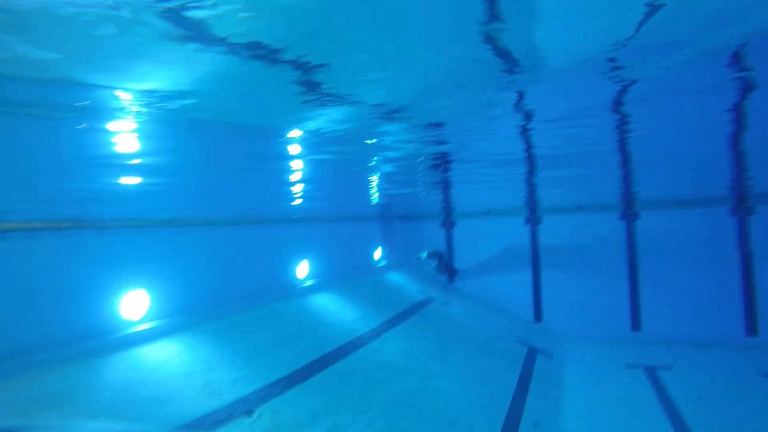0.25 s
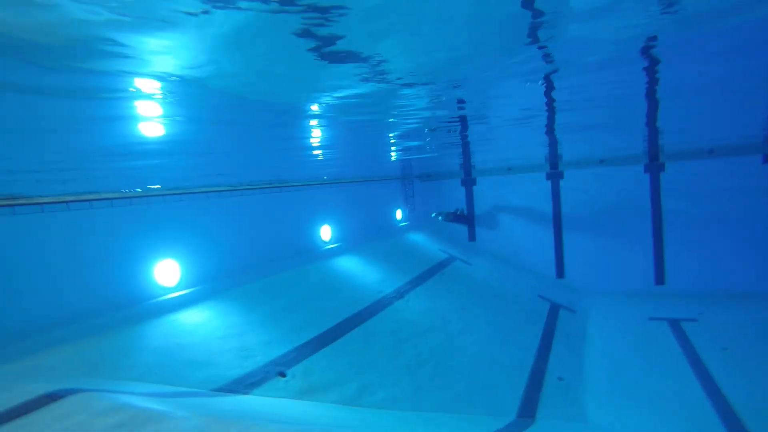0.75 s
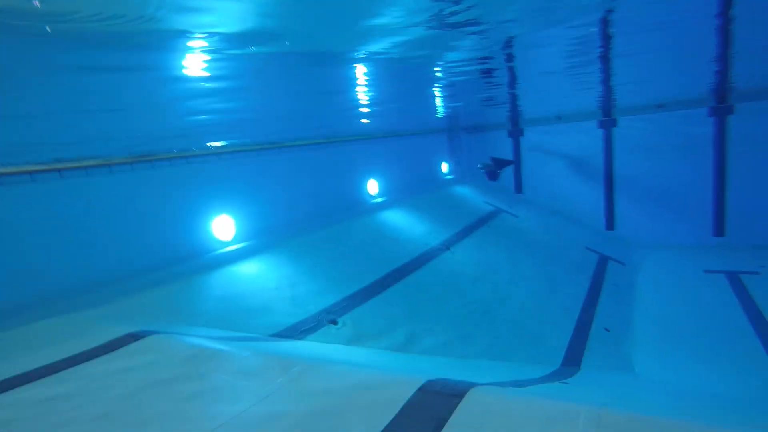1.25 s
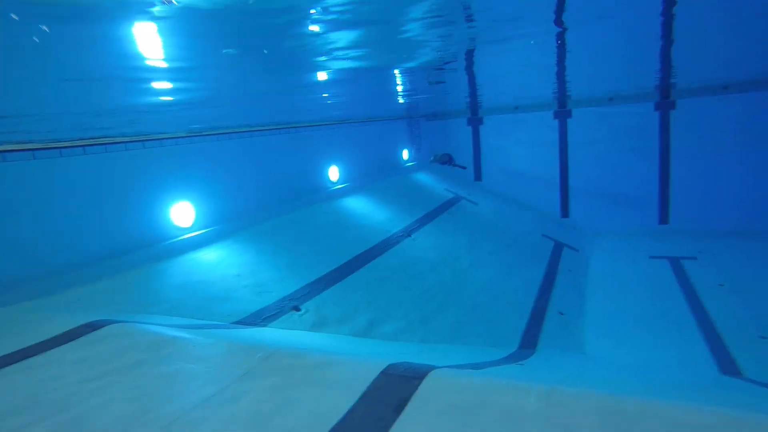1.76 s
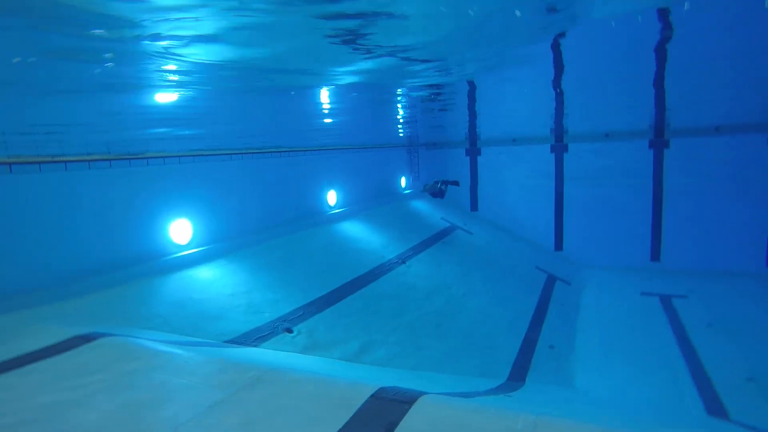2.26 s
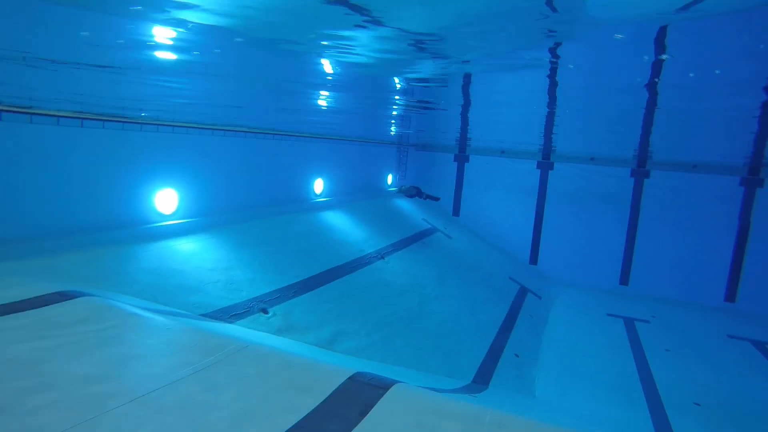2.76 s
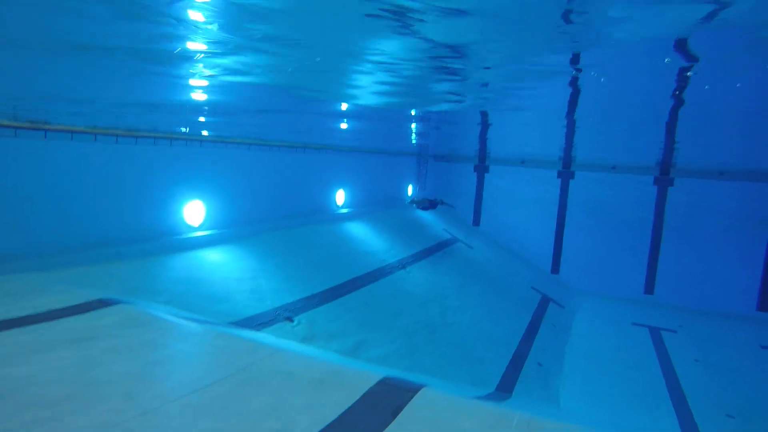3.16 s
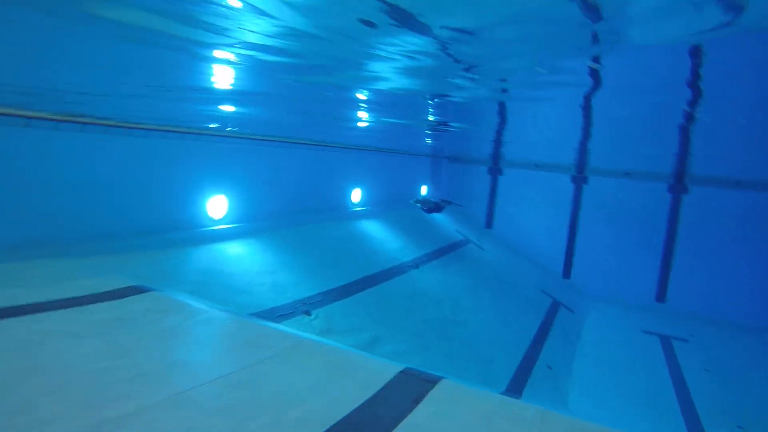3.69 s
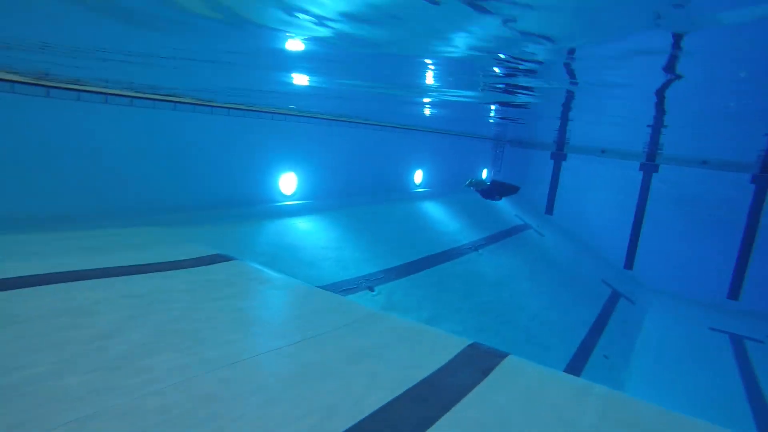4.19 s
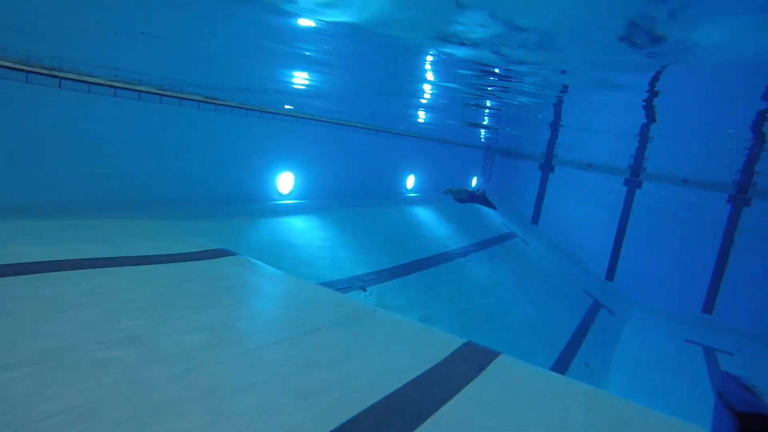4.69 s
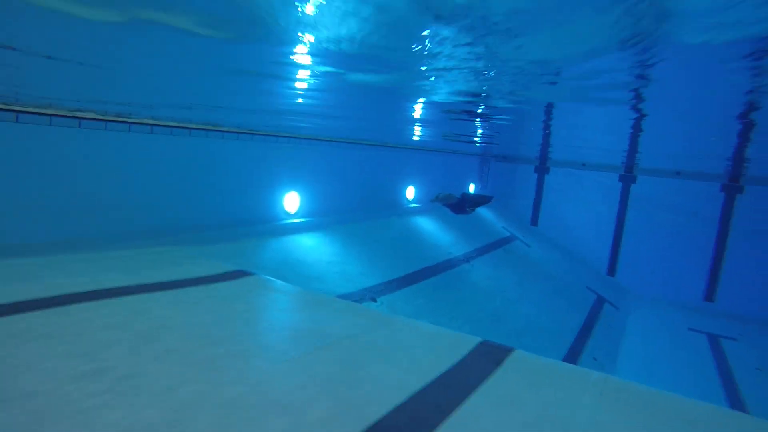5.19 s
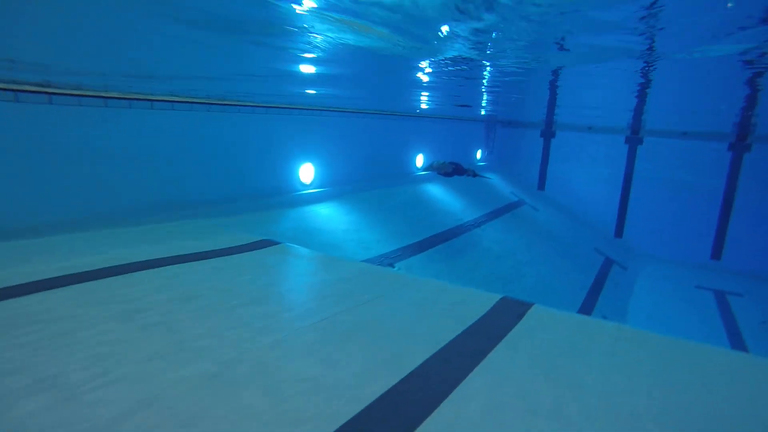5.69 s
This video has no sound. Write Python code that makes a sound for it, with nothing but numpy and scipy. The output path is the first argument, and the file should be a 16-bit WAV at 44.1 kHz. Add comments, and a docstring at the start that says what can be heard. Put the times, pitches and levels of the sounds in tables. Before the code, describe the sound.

Inside a sealed camera housing submerged in an indoor pool, water heaves in deep uneven rumbles and booming jolts. The hand scrapes and bumps the shell, mostly during the first two seconds, among hollow knocks and bubble pings. Later it is calmer, with two short creaks around three and four seconds, sparse high ticks and a small plink near the end, over faint fizz.

```python
"""Hand-held camera housing under water

Water buffets a sealed camera housing in a pool: slow surges, heaves and jolts of low-passed noise and tones.
The hand rubs, bumps and creaks on the shell: gritty noise and slip pulses through resonances.
Bubble pings, small low knocks and high ticks are gliding decaying sines, dry ticks are band-passed clicks,
one plink is a few decaying modes.
Behind it, pool fizz comes through the air gap at the microphone: coloured noise flickering band by band."""
import sys
import numpy as np
from scipy import signal
from scipy.fft import rfft, irfft, next_fast_len
from scipy.io import wavfile
from scipy.ndimage import uniform_filter1d

SR = 44100
rng = np.random.default_rng(int(sys.argv[2]) if len(sys.argv) > 2 else 0)


def master(y):
    """Save y as 16-bit WAV."""
    cut = np.clip(np.atleast_2d(y).T, -1, 1)
    pcm = np.round(cut * 32767)  # scale
    wavfile.write(sys.argv[1], SR, pcm.astype(np.int16))


N = 261954
TIME = np.arange(N) / SR


def undb(db):
    """Decibels to gain."""
    return 10 ** (np.asarray(db) / 20)


def unit(x):
    """Scale to rms 1."""
    return x / np.sqrt(np.mean(x ** 2))


def curve(rows):
    """Table columns joined by straight lines in time."""
    s, *columns = np.transpose(rows)
    return [np.interp(TIME, s, c) for c in columns]


def colour(x, points, lifts=()):
    """Filter by (f/Hz, gain/dB) points plus resonant (f/Hz, half-lift width/Hz, lift/dB) bells."""
    size = next_fast_len(N)
    hz = np.fft.rfftfreq(size, 1 / SR) + 1e-3
    point_hz, point_db = np.transpose(points)
    db = np.interp(np.log(hz), np.log(point_hz), point_db)
    db = db + sum(lift / (1 + (2 * (hz - f) / w) ** 2) for f, w, lift in lifts)
    return irfft(rfft(x, size) * undb(db), size)[:N]


def ring(x, modes, order=1):
    """Sum of resonances, each passed `order` times for steeper skirts."""
    out = 0
    for hz, width_hz, db in modes:
        y = x
        for _ in range(order):
            y = signal.lfilter(*signal.iirpeak(hz, hz / width_hz, SR), y)
        out = out + undb(db) * y
    return out


def walk(rate_hz):
    """Random levels held 1 / rate_hz, smoothed twice, rms 1."""
    k = int(SR / rate_hz)
    held = np.repeat(rng.standard_normal(N // k + 1), k)
    return unit(uniform_filter1d(uniform_filter1d(held, k), k)[:N])


def grit(rate_hz, spread_db):
    """Dense random clicks of uneven size."""
    clicks = (rng.random(N) < rate_hz / SR) * rng.standard_normal(N)
    return clicks * undb(spread_db * rng.exponential(size=N))


def swell(start_s, length_s):
    """Linear rise, plateau and longer fall; at least 10 ms long."""
    u = np.clip((TIME - start_s) / max(length_s, .01), 0, 1)
    rise, fall = 0.24, 0.52  # shares of the length
    return np.minimum(np.minimum(u / rise, (1 - u) / fall), 1)


def peak(s, db, rise_db_s, fall_db_s):
    """Gain that climbs to a peak and dies away, straight in dB."""
    return undb(db - np.where(TIME < s, rise_db_s * (s - TIME), fall_db_s * (TIME - s)))


def swings(rows, wander, rise_db_s, fall_db_s):
    """Low tone swelling at each row, its pitch gliding from row to row with random drift."""
    s, _, hz = np.transpose(rows)
    drift_hz = np.interp(TIME, s, hz) * (1 + wander * walk(15))
    turn = 2 * np.pi * np.cumsum(drift_hz) / SR
    level = sum(peak(s, db, rise_db_s, fall_db_s) for s, db, _ in rows)
    return np.sqrt(2) * np.sin(turn) * level


def even_out(x, window_s):
    """Partly flatten the swells of a noise, rms 1."""
    return unit(x / uniform_filter1d(x ** 2, int(window_s * SR)) ** .45)


def buffet():
    """Eddies rock the housing slowly, keep its soft low mode humming, and heave and jolt it."""
    # water push trend: t/s, slow surge rms level/dB, low shell mode rms level/dB
    push_trend = [(0.0, -34, -47), (0.1, -45, -47), (0.3, -32, -36.5), (0.6, -37, -41.5),
                  (0.85, -35.5, -33.5), (1.0, -43.5, -37), (1.3, -36.5, -45), (1.45, -37.5, -43.5),
                  (1.64, -35, -41.5), (2.2, -39, -45), (3.0, -40, -49), (3.35, -40, -45), (3.9, -43, -50),
                  (4.3, -32, -42.5), (4.65, -39, -44.5), (5.0, -36, -42.5), (5.26, -41.5, -43),
                  (5.94, -39, -41)]
    # surge noise spectrum: f/Hz, relative density/dB
    surge_spectrum = [(6, -0.5), (12, 12), (25, 8), (40, 3), (60, -2), (120, -43)]
    # low shell modes: f/Hz, width per pass/Hz, relative gain/dB
    low_modes = [(71, 25.6, -8), (51, 20, -21)]
    # jolts that set the low mode booming: t of peak/s, peak rms level/dB, mean f/Hz
    jolts = [(0.05, -34.5, 62.9), (0.186, -33, 66.04), (0.279, -21, 64.3), (0.35, -32.5, 58),
             (0.665, -28, 56), (0.776, -30, 68.05), (0.832, -27, 72.9), (1.161, -31.5, 84.1),
             (1.203, -19, 69.75), (1.55, -34, 69), (1.67, -29.5, 72.9), (1.714, -38.5, 73.82),
             (1.785, -28.5, 69.1), (1.97, -42, 63.9), (2.153, -34.5, 66), (2.688, -37.5, 69.95),
             (3.434, -37, 66.9), (3.818, -36, 61.76), (4.06, -39, 69), (4.26, -41, 70.03), (4.87, -40, 72),
             (4.96, -41, 69.1), (5.41, -38, 60.94), (5.703, -34.5, 72.13), (5.835, -34.5, 66.94),
             (5.91, -35.5, 59)]
    # heavier heaves of water: t of peak/s, peak rms level/dB, mean swing rate/Hz
    heaves = [(0.02, -31, 20), (0.391, -25.5, 20), (0.53, -27.5, 16.5), (0.68, -36, 25), (0.83, -35, 15.7),
              (1.125, -31, 24.8), (1.31, -33.5, 20), (1.54, -26, 19.4), (1.65, -33.5, 20.1),
              (1.73, -31.5, 19.7), (1.844, -31.5, 20), (2.085, -31.5, 17.1), (2.76, -31.5, 20.7),
              (3.194, -33, 18), (3.565, -30, 18), (3.845, -32, 21), (4.39, -29.5, 15), (4.54, -32, 22),
              (4.895, -30, 22), (4.99, -33, 24), (5.38, -33, 23), (5.476, -28.5, 23), (5.6, -33, 21),
              (5.826, -31, 24), (5.904, -31.5, 23.3)]
    # brief level dips: t of centre/s, 1/e full width/s, depth/dB
    lulls = [(0.075, 0.029, 6), (0.251, 0.027, 6), (0.455, 0.045, 2.5), (0.57, 0.044, 4.5),
             (0.724, 0.048, 4.5), (1.03, 0.056, 2.5), (1.6, 0.025, 8), (1.76, 0.018, 16), (2.017, .04, 6),
             (3.017, 0.049, 7), (3.498, 0.028, 7), (3.902, 0.061, 6.5), (4.457, 0.036, 3.5),
             (4.604, 0.062, 6.5), (4.857, 0.024, 2), (5.08, 0.038, 10), (5.522, 0.026, 6),
             (5.775, 0.044, 11)]
    eddy_db, eddy_hz = 1.5, 9  # rms random swing about the trend, hold rate
    shell_top_hz = 105.8

    surge_db, mode_db = curve(push_trend)
    surge = even_out(colour(rng.standard_normal(N), surge_spectrum), 0.13)
    hum = even_out(ring(rng.standard_normal(N), low_modes, order=2), 0.065)
    surge = undb(surge_db + eddy_db * walk(eddy_hz)) * surge
    hum = undb(mode_db + eddy_db * walk(eddy_hz)) * hum
    boom = swings(jolts, wander=0.0395, rise_db_s=294, fall_db_s=406)
    lurch = swings(heaves, wander=0.0598, rise_db_s=257, fall_db_s=257)
    lull_db = -sum(db * np.exp(-((TIME - s) / (length / 2)) ** 2) for s, length, db in lulls)
    sway = (surge + hum + boom + lurch) * undb(lull_db)
    # the heavy housing cannot follow faster pushes
    return signal.sosfiltfilt(signal.butter(2, shell_top_hz, fs=SR, output="sos"), sway)


def hand():
    """Rubbing and regrips feed gritty friction into the modes of the shell."""
    # sliding: t/s, rub rms level/dB, middle modes re rub/dB, upper modes re rub/dB
    rub = [(0.03, -62.5, -8, -2), (0.25, -52.5, -17, -12.5), (0.5, -65.5, -4.5, -3),
           (0.72, -60, -5.5, -5.5), (0.88, -58, -11.5, -6.5), (1.26, -64.5, 2.5, -2),
           (1.45, -52.5, -2.5, -7), (1.74, -58.5, -6, -5), (1.94, -63.5, 5, -3.5), (2.11, -73, -1.5, 3.5),
           (3.03, -66.5, -2, -2), (3.69, -69.5, -3.5, -0.5), (3.92, -69, -3, 2), (4.12, -67.5, 4.5, 0.5),
           (4.64, -68.5, -0.5, 0), (5.45, -67, -2.5, -0.5), (5.76, -62, 4.5, -4), (5.94, -62, -13, -4)]
    # regrip scrapes: t of start/s, nominal peak level/dB, length/s, middle, upper, scratch re peak/dB
    bumps = [(0.098, -43, 0.055, -24, -34, -20), (0.257, -42, 0.091, -24, -2.5, -8.5),
             (0.31, -51.5, 0.054, -5, -2, -3), (0.627, -33, 0.06, -8, -27, -24),
             (0.899, -49, 0.064, -8, -7, -12), (0.975, -52, 0.13, -4, -8, -13),
             (1.059, -45, 0.028, -3, -8, -17), (1.112, -50, 0.048, -6, -3, -6),
             (1.136, -33.5, 0.081, -34, -15, -18), (1.611, -38, 0.071, -4.5, -8, -10.5),
             (1.662, -51, 0.046, 4, 5, 0), (5.557, -49, 0.092, 1, -18, -16)]
    # dull shell modes: f/Hz, width per pass/Hz, relative gain/dB
    dull_modes = [(154.7, 40.4, -1.5), (222, 60, -1)]
    # middle shell modes: f/Hz, width per pass/Hz, relative gain/dB
    middle_modes = [(307.7, 40, 3), (396.3, 103, 0.5), (476, 67, -2.5)]
    # upper shell modes: f/Hz, width per pass/Hz, relative gain/dB
    upper_modes = [(600, 126, 6), (674, 440, -6.5)]
    # scratch spectrum: f/Hz, relative density/dB
    scratch_spectrum = [(600, -32), (800, -6), (1020, -4), (1200, 0), (1560, -1), (1700, -20), (2400, -50)]
    crest_db = 9  # nominal scrape peak over its rms
    rub_scratch_db = -24.5  # re rub

    rub_db, middle_db, upper_db = curve(rub)
    # rows: dull, middle, upper, scratch
    push = undb([rub_db, rub_db + middle_db, rub_db + upper_db, rub_db + rub_scratch_db])
    for s, db, length_s, *share_db in bumps:
        gain = undb(db - crest_db + np.array([0, *share_db]))
        push = push + swell(s, length_s) * gain[:, None]
    friction = unit(grit(4000, 1.3))
    out = push[-1] * unit(colour(friction, scratch_spectrum))
    for p, modes in zip(push, (dull_modes, middle_modes, upper_modes)):
        out = out + ring(p * friction, modes, order=2) / np.std(ring(friction, modes, order=2))
    return out


def creak():
    """Skin sticks and slips; each slip pulses the shell, and a sine follows the last creak's slip rate."""
    # creaks: t of start/s, length/s, first slip rate/Hz, last slip rate/Hz, loudest at share of length,
    # first level/dB, peak level/dB, evenness of rate (0-1)
    creaks = [(3.098, 0.14, 59, 50, 0.44, -74, -66, 0.7), (3.778, 0.34, 198, 205, 1, -74, -57.5, .93)]
    # shell modes: f/Hz, width per pass/Hz, relative gain/dB
    modes = [(349.3, 107, -3), (212, 81, -8.5), (596, 32, -21)]
    end_db = -15  # re peak
    hum_s, hum_db, hum_fade_db_s = 3.96, -58, 45

    out = 0
    for s, length_s, first_hz, last_hz, loudest, first_db, db, evenness in creaks:
        u = (TIME - s) / length_s
        on = (u > 0) & (u < 1)
        rate_hz = np.interp(u, (0, 1), (first_hz, last_hz))
        jitter = np.clip(1 + (1 - evenness) * walk(60), .2, 3)
        phase = .97 + np.cumsum(on * rate_hz * jitter) / SR
        # one pulse per whole cycle
        pulses = np.diff(np.floor(phase), prepend=0) * undb(1.4 * walk(80))
        body = ring(pulses / np.sqrt(rate_hz), modes, order=2)
        level_db = np.interp(u, (0, np.clip(loudest, .05, .95), 1), (first_db, db, db + end_db))
        out = out + undb(level_db) * body / np.std(body[on])
    hum = np.sqrt(2) * np.sin(2 * np.pi * phase)
    return out + on * peak(hum_s, hum_db, hum_fade_db_s, hum_fade_db_s) * hum


def slips():
    """A slow creak falls apart into separate soft pulses through the shell modes."""
    # single slips: t/s, peak level of each alone/dB
    slip_rows = [(3.274, -47), (3.294, -54), (3.315, -47), (3.341, -45), (3.365, -45), (3.384, -52),
                 (3.403, -49), (3.423, -50), (3.441, -50), (3.458, -58), (3.493, -59)]
    # shell modes: f/Hz, width per pass/Hz, relative gain/dB
    modes = [(362, 104, -3), (213, 50, -8), (600, 66, -17.5)]
    pulses = np.zeros(N)
    for s, db in slip_rows:
        pulses[int(s * SR)] = undb(db)
    one = ring(np.arange(SR) == 0, modes, order=2)
    return ring(pulses, modes, order=2) / np.abs(one).max()


def pings_and_knocks():
    """Bubble pings, small low knocks and high ticks as decaying sines gliding up; faint strays at random."""
    # single pings and knocks: t/s, level before build-up and decay/dB, starting f/Hz
    ping_rows = [(0.26, -29, 125), (0.262, -35, 266), (0.288, -32, 285), (0.328, -27.5, 247),
                 (0.35, -34.5, 220), (0.3721, -59, 11000), (0.4728, -44, 2450), (0.655, -42, 170),
                 (0.655, -37, 540), (0.667, -38.5, 630), (0.848, -50, 610), (0.905, -42.5, 268),
                 (0.918, -40, 600), (0.934, -48, 600), (0.975, -46, 600), (1.065, -42, 600),
                 (1.096, -51, 624), (1.115, -46, 600), (1.156, -33.5, 241), (1.175, -47, 610),
                 (1.237, -47, 660), (1.37, -42, 250.5), (1.393, -44, 262), (1.412, -48, 680),
                 (1.425, -49, 262), (1.46, -50, 250), (1.525, -45, 600), (1.2965, -47, 2250),
                 (1.297, -46, 3400), (1.2975, -44, 4000), (1.309, -50, 3500), (1.309, -45, 2380),
                 (1.3144, -48, 2430), (1.322, -43, 2470), (1.3324, -44, 2700), (1.62, -30, 213),
                 (1.647, -36.5, 600), (1.657, -38, 606), (1.673, -47, 725), (1.688, -45, 272),
                 (1.734, -49, 290), (1.767, -43, 192), (1.8098, -49.5, 3350), (1.845, -44, 349.7),
                 (1.93, -47, 439), (1.965, -52, 350), (2.821, -55, 9500), (2.9058, -50.5, 5550),
                 (2.936, -58, 9500), (3.0285, -54, 7800), (3.73, -49, 3300), (3.77, -50, 3080),
                 (3.805, -51, 2220), (3.8182, -45.5, 2200), (4.1021, -59, 12900), (4.5321, -56, 7900),
                 (4.851, -39, 282.5), (4.855, -51, 189.5), (4.9, -50, 348.2), (4.9167, -53, 5875),
                 (5.1327, -50, 2198), (5.3582, -48, 3440), (5.3817, -56, 9340), (5.3986, -41, 2300),
                 (5.545, -44, 404), (5.69, -51, 375), (5.745, -53, 350), (5.822, -48, 340),
                 (5.891, -43, 479.5)]
    t60_1khz_s, t60_law = 0.035, 0.54  # t60 falls with pitch by this power
    t60_most_s = 0.096  # low knocks are damped by the shell
    phase_glide = 0.0065  # pitch rises by twice this share over the ring
    build_cycles = 2.6

    chance = rng.random((500, 3))
    stray = [(a * TIME[-1], -65 + 15 * b ** 3 - 9 * c, 1800 * 7 ** c) for a, b, c in chance]
    out, t = np.zeros(N + SR), np.arange(SR) / SR
    for s, db, hz in list(ping_rows) + stray:
        t60_s = min(t60_1khz_s * (1000 / hz) ** t60_law, t60_most_s)
        u = t[:int(t60_s * SR)]
        tone = np.sin(2 * np.pi * hz * u * (1 + phase_glide * u / t60_s))
        decay = np.exp(-np.log(1000) * u / t60_s)
        build = np.sin(np.pi / 2 * np.minimum(u * hz / build_cycles, 1))
        out[int(s * SR):int(s * SR) + len(u)] += undb(db) * tone * decay * build
    return out[:N]


def ticks():
    """A sharp click with a very short hiss behind it, each in its own band."""
    # dry ticks: t/s, peak level/dB, lower edge f/Hz, upper edge f/Hz
    tick_rows = [(0.2015, -56, 10000, 13000), (0.637, -55, 8500, 10500), (1.2964, -53, 2000, 4600),
                 (2.9058, -62, 4200, 6500), (3.7624, -49, 5600, 7810), (3.768, -62, 8500, 12000),
                 (4.0055, -52, 9500, 14500), (4.081, -57, 13010, 14800), (4.566, -51, 10500, 14800),
                 (4.993, -48, 5300, 8990), (5.354, -54, 8010, 10500), (5.5438, -59, 4503, 6495),
                 (5.6696, -54, 5200, 6800), (5.852, -59, 10010, 12500), (5.891, -49, 10010, 14500)]
    hiss_t60_s = 0.004
    out, u = np.zeros(N + SR), np.arange(SR // 50) / SR
    for s, db, low_hz, high_hz in tick_rows:
        hiss = 0.8 * rng.standard_normal(len(u)) * undb(-60 * u / hiss_t60_s)
        band = signal.butter(2, (low_hz, high_hz), "band", fs=SR, output="sos")
        tick = signal.sosfilt(band, (u == 0) + hiss)
        out[int(s * SR):int(s * SR) + len(u)] += undb(db) * tick / np.abs(tick).max()
    return out[:N]


def plink():
    """A few decaying modes start together; their pitch sags as they start."""
    # modes: settled f/Hz, level re plink/dB, t60/s
    modes = [(1375, -2.5, 0.084), (1801, -9, 0.022), (540, 6.5, 0.016), (2300, -8, .012)]
    start_s, level_db, rise_s = 5.6235, -39.5, 0.0028
    drop, drop_s = 0.076, 0.0035  # initial pitch excess as a share, settling time constant
    u = np.maximum(TIME - start_s, 0)
    turn = 2 * np.pi * (u + drop * drop_s * (1 - np.exp(-u / drop_s)))
    tone = sum(undb(level_db + db - 60 * u / t60_s) * np.sin(hz * turn) for hz, db, t60_s in modes)
    return np.minimum(u / rise_s, 1) * tone


def fizz():
    """Countless far bubbles blur into a hiss; each band flickers a little on its own."""
    # pool fizz trend: t/s, level/dB (swing about the mean weighted per band)
    fizz_trend = [(0.0, -62.5), (0.25, -62), (0.51, -59), (0.92, -60.5), (1.19, -59.5), (1.5, -59),
                  (1.7, -60.5), (2.28, -62), (2.45, -63), (2.7, -60.5), (3.2, -61), (3.49, -60.5),
                  (3.82, -61.5), (4.33, -60), (5.77, -64.5), (5.94, -64)]
    # fizz spectrum: f/Hz, relative density/dB
    fizz_spectrum = [(59, -13), (100, -47), (113, -8), (146, -3.5), (208, -10.5), (274, -11.5), (453, -11),
                     (595, -19), (675, -25.5), (1240, -21.5), (2280, -18.5), (3400, -19), (4750, -23.5),
                     (9490, -29), (15100, -34)]
    # air gap resonances and dips: f/Hz, half-lift width/Hz, lift or dip/dB
    air_gap = [(547, 74, 7), (906, 204, 7.5), (1595, 37, 6), (1680, 40, -2.5), (1806, 130, 6.5),
               (1904, 70, -5.5), (2270, 520, 9), (2580, 60, -3.5), (2780, 193, 7.5), (2920, 71, -6),
               (3070, 110, 3.5), (3380, 405, 8), (4200, 540, 4), (5640, 1550, 4.5), (9500, 580, 4)]
    # puffs of fine bubbles close by: t of start/s, length/s, lift before band weights/dB
    puff_rows = [(1.291, 0.048, 6), (1.36, 0.022, 2.5), (5.387, 0.065, 4.5)]
    edges_hz = [0, 1500, 2050, 2550, 3050, 4500, 7500, SR / 2]
    # band weights of the trend, the puffs and the flicker
    trend_weights = [0.039, 0.83, 0.96, 1.0, 0.86, 0.2, 0.095]
    puff_weights = [0.05, 0.1, 0.6, 1.1, 1.3, 0.85, 0.44]
    flicker_weights = [0.08, 0.4, 0.62, 0.86, 0.77, 0.34, 0.39]

    size = next_fast_len(N)
    hz = np.fft.rfftfreq(size, 1 / SR)
    spectrum = rfft(colour(rng.standard_normal(N), fizz_spectrum, air_gap), size)
    bands = [irfft(spectrum * ((hz >= a) & (hz < b)), size)[:N] for a, b in zip(edges_hz, edges_hz[1:])]
    db = curve(fizz_trend)[0]
    puff_db = sum(lift_db * swell(s, length_s) for s, length_s, lift_db in puff_rows)
    out = 0
    for band, k, p, f in zip(bands, trend_weights, puff_weights, flicker_weights):
        flicker_db = f * (0.5 * walk(12) + 1.5 * walk(40))
        out = out + band * undb(db.mean() + k * (db - db.mean()) + p * puff_db + flicker_db)
    return out / np.std(sum(bands[1:5]))  # level reference: 1.5-4.5 kHz


def scene():
    """Everything reaches one microphone inside the housing."""
    shell = buffet() + hand() + creak() + slips()
    return (shell + pings_and_knocks() + ticks() + plink() + fizz())[None]


def record(dry):
    """Steep low-pass at the top of the treble."""
    top_hz = 15210
    return signal.sosfilt(signal.ellip(10, .2, 60, top_hz, fs=SR, output="sos"), dry)


dry = scene()
out = record(dry)
master(out)
```